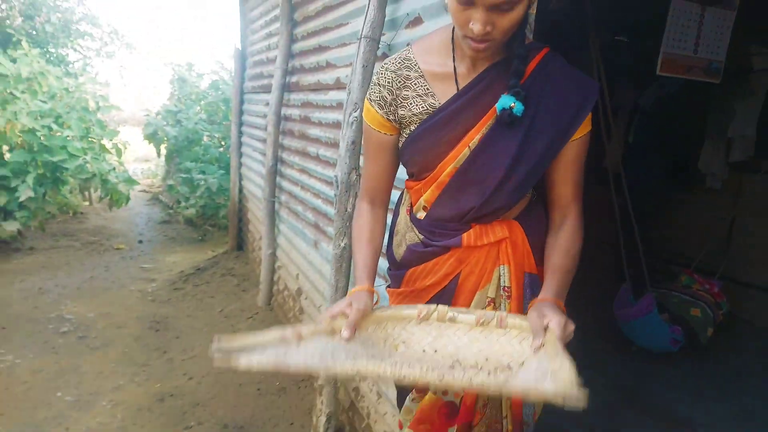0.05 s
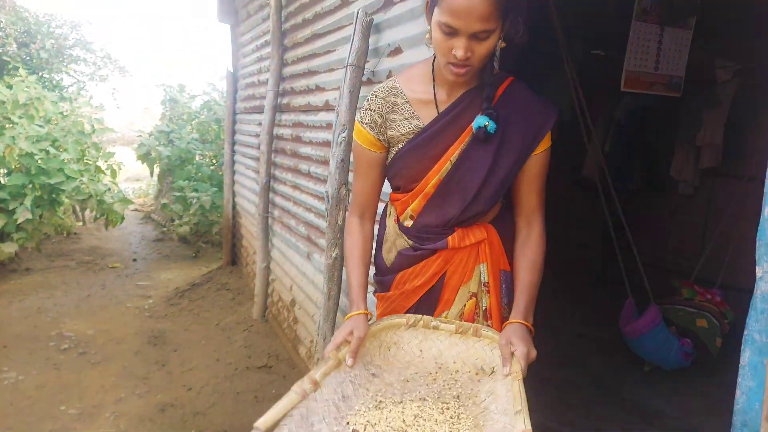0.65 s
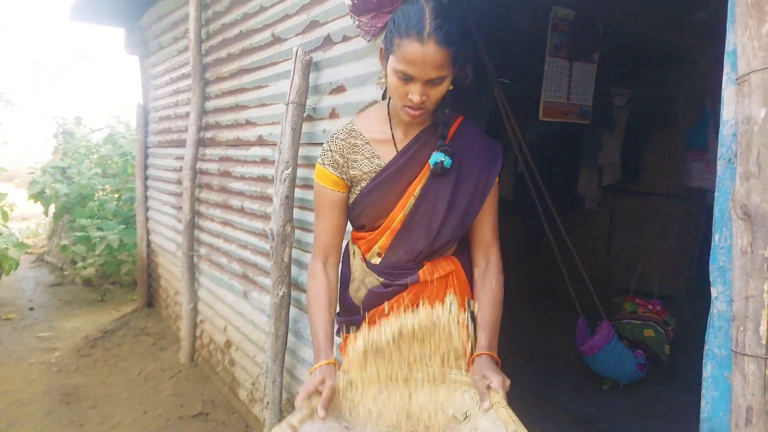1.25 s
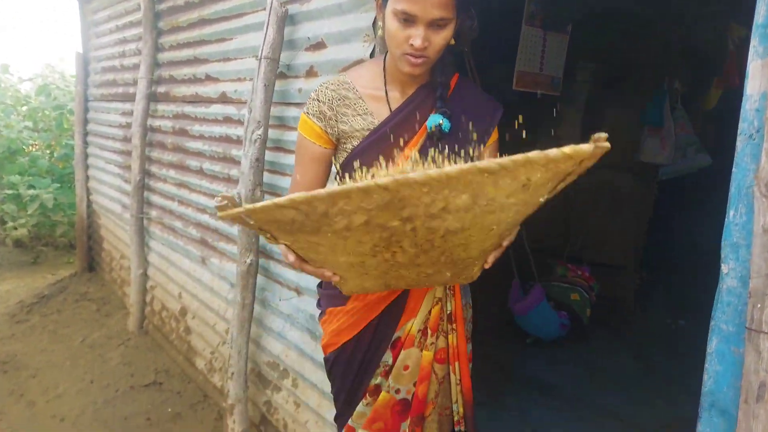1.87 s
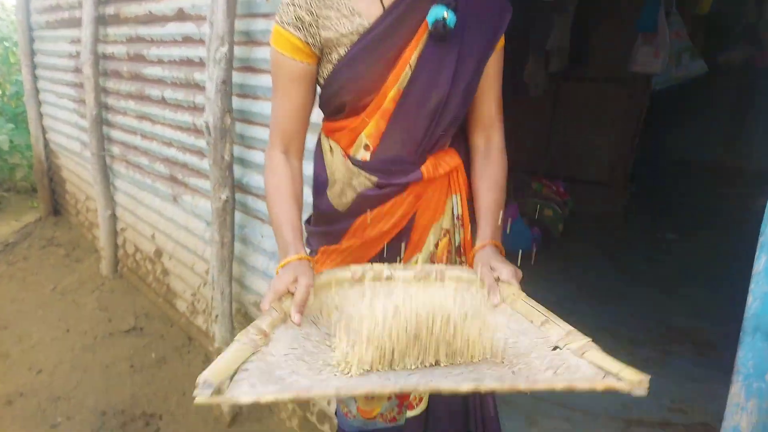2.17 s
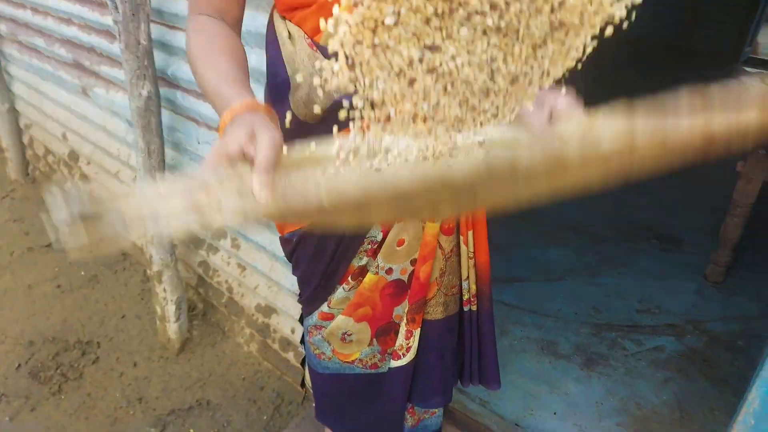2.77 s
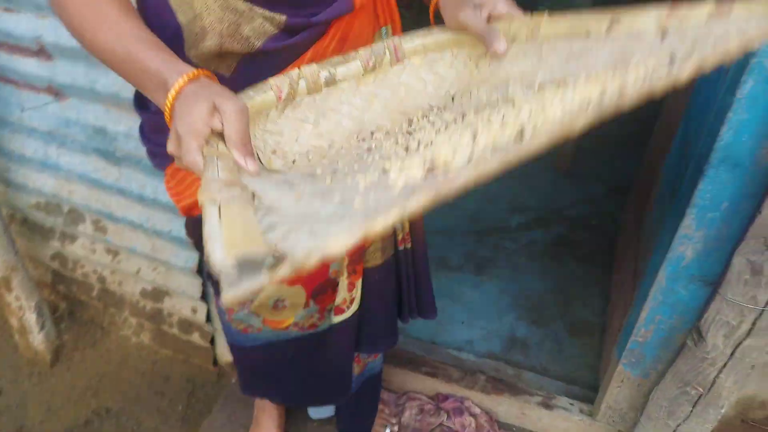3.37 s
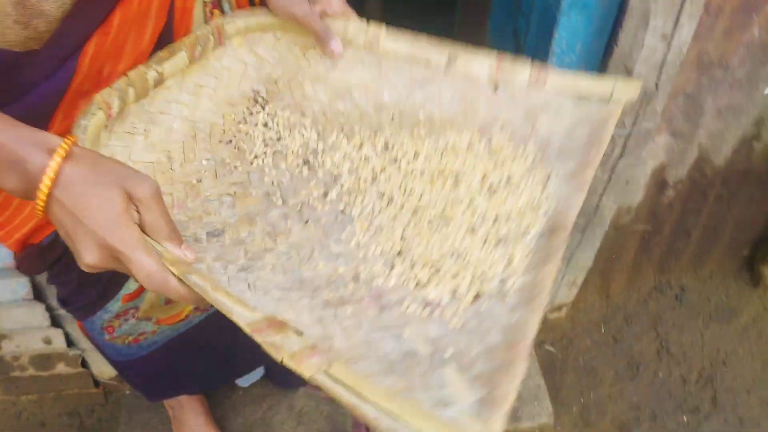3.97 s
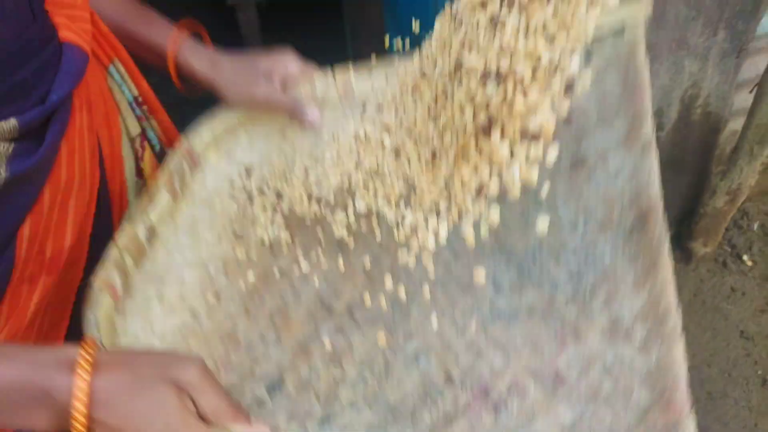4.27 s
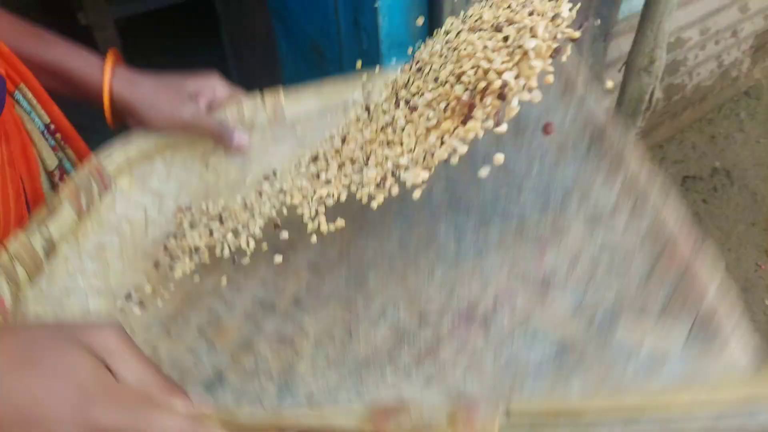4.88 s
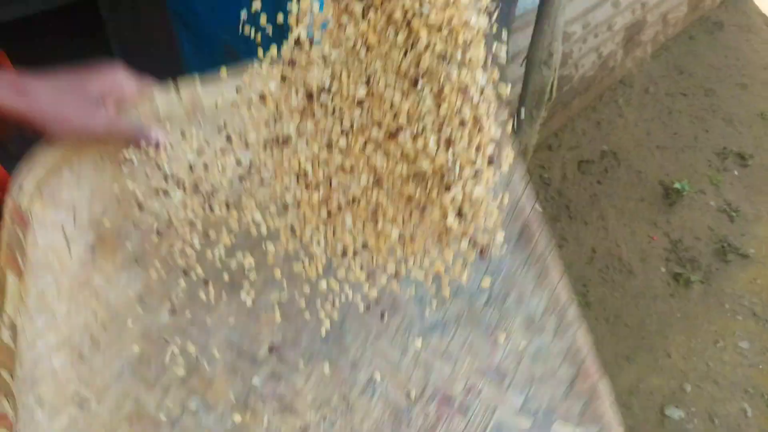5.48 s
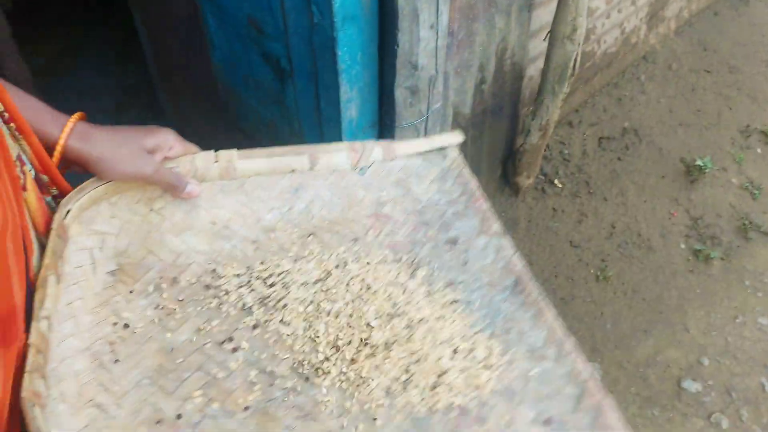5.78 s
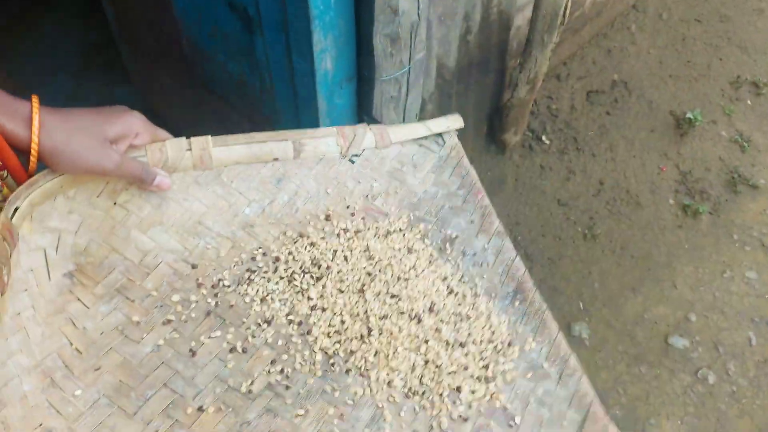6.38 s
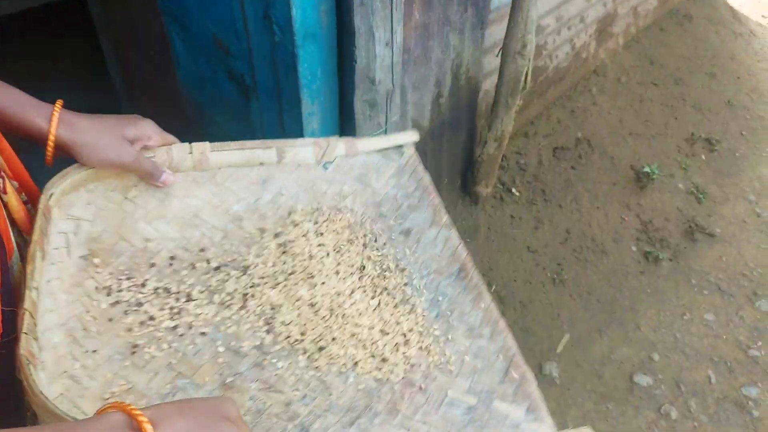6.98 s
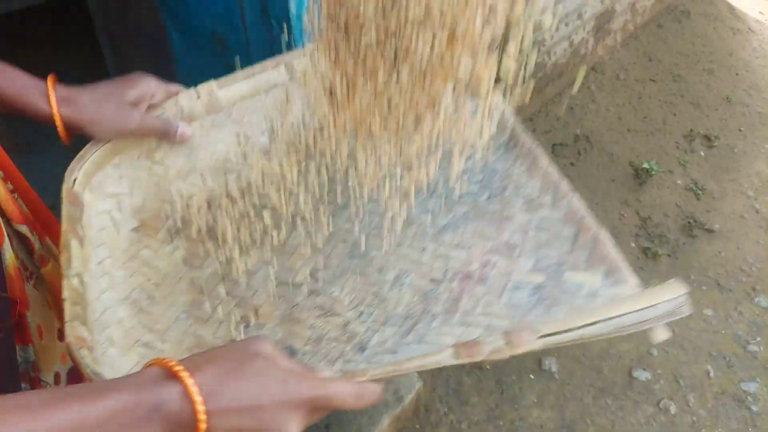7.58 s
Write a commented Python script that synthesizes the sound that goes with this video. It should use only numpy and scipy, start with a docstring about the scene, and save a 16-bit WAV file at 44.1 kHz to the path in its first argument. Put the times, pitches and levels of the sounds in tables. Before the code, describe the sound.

Close, repeated showers of kernels patter and slide across a bamboo winnowing tray, with a low yard rumble and faint bird chirps.

```python
"""Grain swishes on a woven bamboo tray as it is winnowed in front of a house. One toss is already
settling and ten more follow, each a shower of thousands of tiny hits that thins out as the kernels
roll to rest. The tone shifts as the microphone moves from the front of the tray to over it, and one
swing fans a puff of air into it. A small bird chirps, a slow engine thuds far off, the yard rumbles."""
import sys
import numpy as np
from scipy import signal
from scipy.fft import rfft, irfft
from scipy.io import wavfile
from scipy.ndimage import uniform_filter1d

SR = 44100
rng = np.random.default_rng(int(sys.argv[2]) if len(sys.argv) > 2 else 0)


def transcribe(u):
    """Save the signal u as a 16-bit wav file named by the first command-line argument.

    u: samples, shape (n,) or (channels, n), limited to [-1, 1]; the rate is SR.
    q: integer samples, one column per channel.
    """
    v = np.clip(np.atleast_2d(u).T, -1, 1)
    q = np.round(v * 32767).astype(np.int16)
    wavfile.write(sys.argv[1], SR, q)


N = 336924

# One row a toss; each heap lands on another spot of the mat, which rings in its own way:
# start_s, rise_s, abruptness, peak_db, fall_s, roll_db, roll_s, body_db,
# ring_hz, ring_width_hz, ring_db, rattle_db
TOSSES = [ (-0.24, 0.076, 3.0, -26, .14, -25.5, 0.42, -15, 870, 90, -15, -20),
          (0.526, 0.087, 3.46, -20.5, 0.15, -27, 0.4, -23.5, 867, 100, 16, -29),
          (1.36, 0.066, 3.2, -13.5, 0.12, -27, 0.39, -16.5, 824, 295, 0.5, -28),
          (2.213, 0.078, 5.5, -15.5, 0.13, -25, 0.39, -18, 554, 60, 7.5, -41.5),
          (3.029, 0.041, 2.9, -11, 0.082, -24, 0.35, -18.5, 570, 60, 4.5, -10.5),
          (3.802, 0.042, 2.9, -16, 0.14, -26, 0.35, -11.5, 678, 200, -5.5, 2.5),
          (4.458, 0.099, 6.4, -15.5, 0.12, -27.5, 0.3, -10.5, 1394, 1200, -5, 0.5),
          (5.089, 0.099, 4.5, -16, 0.098, -25, 0.26, -11, 1260, 260, -1, -3),
          (5.625, 0.13, 1.45, -16.5, 0.13, -27, .30, -10, 1515, 160, -6.5, -23.5),
          (6.222, 0.13, 1.04, -14, 0.12, -26.5, 0.34, -10, 1450, 260, -2, -4),
          (6.906, 0.072, 3.4, -13, 0.12, -27.5, .34, -16, 1513, 250, -15.5, -32.5), ]
# Tone of kernels striking the weave: pitch_hz, gain_db
WEAVE_TONE = [(150, -47), (250, -2), (268, -21), (313, -7), (490, -10), (593, -5), (681, -7.5), (945, -6.5),
              (1070, -6.5), (1220, -7.5), (2130, -9.5), (3510, -6), (8320, -8.5), (12200, -5.5),
              (15500, -9.5)]
# Where the microphone is: time_s, position (0 in front of the tray, 1 over it)
MIC_POSITION = [(0, 0.37), (2.3, 0.49), (3.1, 0.67), (3.85, 0.88), (4.5, 1), (7, 0.85)]


def grain(hits_per_s=32000, thinning=.62, strip_db=8, split_hz=2000, body_db=-1, hardness=.19):
    """Kernels rain on the bamboo strips; the quieter the swish, the fewer and softer the hits."""
    # Notes at which the strips ring: pitch_hz, width_hz
    strips = [(930, 270), (1250, 540), (2040, 2000), (3250, 1900), (3600, 1200), (4330, 480), (5050, 850),
              (6400, 2000), (10500, 2200), (14800, 980)]
    level_db, mat_db = toss_levels()
    force_db = np.maximum(level_db, -65) + 19  # a swish at -19 dB has hits_per_s hits a second
    per_s = hits_per_s * undb(thinning * force_db)
    lead_s = .00008 * curve(MIC_POSITION)  # over the tray, the left side is nearer
    hits = 0
    for hz, width in strips:
        taps = impacts(per_s / len(strips), lead_s, scatter_db=2, spread_s=.00007)
        hits = hits + taps + undb(strip_db) * ring(taps, hz, width)
    hits = mat(colour(hits, WEAVE_TONE))
    hiss = unit(cut(hits, split_hz, "high", order=3))
    body = unit(cut(hits, split_hz, "low", order=3))
    # falling kernels click brightly, rolling ones are duller
    hiss = hiss + (undb(hardness * force_db) - 1) * cut(hiss, hz=7500, kind="high", order=1)
    swish = hiss + undb(body_db + mat_db) * body
    return undb(level_db) * swish + strip_pings(level_db) + stray_seeds(level_db)


def toss_levels(climb_db=39, fall_db=20.5, roll_loss_db=26.5, creep_db_per_s=28.5, slide_s=.12):
    """Heaps land, roll and creep to rest. Gives the kernels' level and the tray's relative to it, in dB."""
    t = np.arange(N) / SR
    kernel_power, body_power = np.full(N, 1e-11), np.full(N, 1e-12)
    for start_s, rise_s, abruptness, peak_db, fall_s, roll_db, roll_s, body_db, *_ in TOSSES:
        on = t >= start_s
        age = t[on] - start_s
        rise_db = -climb_db * np.maximum(1 - age / rise_s, 0) ** abruptness
        past_peak = np.maximum(age - rise_s, 0)
        # landing and rolling fade ever faster; the last few kernels fade steadily
        landing = undb(peak_db + rise_db - fall_db * (past_peak / fall_s) ** 1.97) ** 2
        rolling = undb(roll_db - roll_loss_db * (past_peak / roll_s) ** 2.3) ** 2
        creeping = undb(roll_db - 24.5 - creep_db_per_s * past_peak) ** 2
        # only kernels that have come down can roll, and they take a moment to start
        moving = undb(rise_db) * np.minimum(age / (rise_s + slide_s), 1)
        settling = (rolling + creeping) * moving ** 2
        kernel_power[on] += landing + settling
        body_power[on] += landing * undb(body_db) ** 2 + settling * undb(-9.5) ** 2
    clumps_db = .97 * wander(70)  # kernels arrive in clumps
    return 10 * np.log10(kernel_power) + clumps_db, 10 * np.log10(body_power / kernel_power)


def impacts(per_s, lead_s, scatter_db, spread_s):
    """Random hits of even average power; each lands elsewhere, so has its own left-right delay."""
    chance, size, lag = rng.random(N), rng.standard_normal(N), rng.laplace(size=N)
    left_at = np.flatnonzero(chance < per_s / SR)
    sign = np.sign(rng.random(N)[left_at] - .5)
    push = sign * undb(scatter_db * np.minimum(size[left_at], 2)) / np.sqrt(per_s[left_at])
    delay_s = lead_s[left_at] + lag[left_at] * spread_s
    right_at = np.clip(left_at + np.round(delay_s * SR).astype(int), 0, N - 1)
    return np.array([np.bincount(left_at, push, N), np.bincount(right_at, push, N)])


def mat(hits, swell_s=.051, lag_s=.0056):
    """While a heap comes down, the spot under it drums and the loose strips rattle."""
    out, t = hits, np.arange(N) / SR
    rattle = ring(hits, hz=3100, width_hz=600)
    for start_s, rise_s, *_, hz, width, ring_db, rattle_db in TOSSES:
        swell = np.exp(-((t - start_s - rise_s - lag_s) / swell_s) ** 2)
        out = out + swell * (undb(ring_db) * ring(hits, hz, width) + undb(rattle_db) * rattle)
    return out


def strip_pings(level_db, count=2500, fade_s=.057, low_hz=700, high_hz=13000, ping_db=-3, bright_db=5):
    """Some kernels hit a tight strip squarely, and it rings briefly at its own pitch."""
    out, t = np.zeros((2, N + 2048)), np.arange(2048) / SR
    for when, height, size, side in rng.random((count, 4)):
        start = int(when * (N - 1))
        hz = low_hz * (high_hz / low_hz) ** height
        tone = np.sin(2 * np.pi * hz * t) * undb(-60 * t / fade_s)
        # the short, high strips sound louder than the long ones
        gain = size ** 2 * undb(level_db[start] + ping_db + bright_db * height)
        out[:, start:start + len(t)] += gain * np.outer([side, 1 - side], tone)
    return out[:, :N]


def stray_seeds(level_db, per_s=130, loudest_db=-38, follow=.85):
    """Single seeds keep bouncing as the heap settles; their crisp ticks die down slower than the swish."""
    taps = impacts(np.full(N, per_s), np.zeros(N), scatter_db=4, spread_s=.0002)
    seeds = colour(taps + 2 * ring(taps, hz=4200, width_hz=1500), WEAVE_TONE)
    drop_db = follow * np.minimum(level_db + 28, 0)  # they fade once the swish is below -28 dB
    return unit(cut(seeds, 1800, "high")) * undb(loudest_db + drop_db)


def ticks(fade_s=.02, width_hz=1300, snap=.42, gain_db=-2):
    """Lone kernels and the bending rim each make a dry snap with a short ring."""
    # Kernel clicks and rim creaks: start_s, relative_peak_db, ring_hz
    snaps = [(0.9347, -21, 5060), (1.3437, -25, 5040), (2.621, -32, 5000), (3.4118, -27, 3960),
             (3.795, -24.5, 3590), (3.8062, -24, 2970), (4.3819, -34, 4990), (4.467, -14, 5100),
             (4.9795, -34, 3970), (5.1058, -11, 5440), (5.466, -26, 4600), (5.5297, -33, 4130),
             (5.658, -17, 4800), (6.088, -31.5, 6500), (6.2762, -14.5, 4370), (6.717, -29, 3550),
             (6.832, -32.5, 5000), (6.9045, -20, 4530)]
    out, t = np.zeros((2, N)), np.arange(1024) / SR
    for start_s, db, hz in snaps:
        crack = rng.standard_normal((2, len(t))) * undb(-60 * t / fade_s)
        tick = snap * crack + ring(crack, hz, width_hz)
        start = int(start_s * SR)
        out[:, start:start + len(t)] += undb(db + gain_db) * tick / np.abs(tick).max()
    return out


def moving_microphone(x):
    """The microphone's two sides face different ways, so their tone changes as it moves over the tray."""
    # Balance in front of the tray, then over it: pitch_hz, left_minus_right_db
    in_front = [(300, -5), (1500, 2), (2700, 3.5), (4300, -10.5), (6000, -10), (8000, 4), (11000, 6.5),
                (15000, 4.5)]
    overhead = [(300, 3), (1500, 0.5), (2700, 0.5), (4300, -2), (6000, -2.5), (8000, 1.8), (11000, 0),
                (15000, 3.5)]

    def heard(balance):
        left = colour(x[[0]], [(hz, db / 2) for hz, db in balance])
        right = colour(x[[1]], [(hz, -db / 2) for hz, db in balance])
        return np.vstack([left, right])
    position = curve(MIC_POSITION)
    return (1 - position) * heard(in_front) + position * heard(overhead)


def wall_echo(x, fade_s, dull_hz, delay_s=.006):
    """Sound bounces off the house front and the doorway as a blurred echo."""
    t = np.arange(SR // 2) / SR
    tail = rng.standard_normal((2, len(t))) * undb(-60 * t / fade_s) * (t > delay_s)
    tail /= np.sqrt(np.sum(tail ** 2) / 2)
    return signal.fftconvolve(x, cut(tail, dull_hz, "low", order=1), axes=1)[:, :N]


def air_puff(left_db=-32):
    """Swirls of air from the swinging tray buffet the right side of the microphone."""
    # Tone of the swirling air: pitch_hz, gain_db
    swirl_tone = [(25, -30), (40, -14), (55, 1), (120, 1), (160, -9), (230, -12), (380, -21), (600, -40),
                  (1200, -70)]
    # Strength of the puff: time_s, level_db
    strength = [(2.87, -60), (2.905, -36), (2.94, -15), (2.995, -13.5), (3.022, -23.5), (3.042, -18),
                (3.06, -27), (3.1, -59)]
    swirls = colour(rng.standard_normal((1, N)), swirl_tone)
    swirls /= np.sqrt(uniform_filter1d(swirls ** 2, size=1300))  # even out chance swells
    return swirls * undb(curve(strength, outside=-140)) * np.array([[undb(left_db)], [1]])


def bird(flutter_db=2.5, gain_db=3):
    """A small bird sings short, raspy, breathy glides that echo briefly off the walls."""
    # The bird's notes: start_s, length_s, from_hz, to_hz, relative_level_db
    chirps = [(4.9, .07, 3600, 3150, -55), (4.91, .055, 4200, 3850, -55), (5.044, .03, 6200, 5400, -60),
              (5.055, .05, 4400, 3400, -52), (7.573, .04, 5400, 6000, -47), (7.608, .05, 3800, 5900, -41)]
    out, flutter = np.zeros(2 * N), wander(250)
    rasp = 1 + .045 * wander(1100)
    breath = .28 * unit(ring(rng.standard_normal(N), hz=5200, width_hz=2200))
    for start_s, length_s, from_hz, to_hz, db in chirps:
        progress = np.linspace(0, 1, int(length_s * SR))
        at = int(start_s * SR) + np.arange(len(progress))
        hz = (from_hz + (to_hz - from_hz) * progress) * rasp[at % N]
        phase = 2 * np.pi * np.cumsum(hz) / SR
        note = np.sin(phase) + .027 * np.sin(2 * phase) + breath[at % N]
        out[at] += undb(db + flutter_db * flutter[at % N]) * np.sin(np.pi * progress) * note
    song = undb(gain_db) * np.array([out[:N], out[:N]])
    return song + undb(-6) * wall_echo(song, fade_s=.15, dull_hz=9000)


def far_engine(firing_hz=20.18):
    """Each firing of a one-cylinder engine makes its exhaust boom; distance softens the thuds."""
    # Notes at which the exhaust rings: pitch_hz, width_hz, gain_db
    exhaust = [(81, 26, 4), (102, 26, -2), (158, 70, -11), (201, 20, -8), (242, 10, 1)]
    # Loudness of the engine: time_s, level_db
    loudness = [(0, -42.5), (2.2, -49.5), (2.7, -46), (3.6, -52.5), (4.6, -44.5), (5.6, -47.5),
                (6.7, -43.5), (7.5, -51.5)]
    cycles = np.cumsum(firing_hz * (1 + .003 * wander(2))) / SR
    firings = np.diff(np.floor(cycles), prepend=0) * undb(1.2 * wander(20))  # one kick a cycle
    thuds = 0
    for hz, width, db in exhaust:
        boom = ring(ring(firings, hz, width), hz, width)
        thuds = thuds + undb(db + 1.8 * wander(5)) * boom
    return undb(curve(loudness)) * unit(thuds)


def yard(shared_hz=900, bass_side=.19, flicker_db=1, gain_db=-3.5):
    """Distant outdoor rumble, alike on both sides in the bass and unrelated in the treble."""
    # Tone of the rumble: pitch_hz, gain_db
    rumble_tone = [(18, -24), (30, -48), (69, 10), (187, -1.5), (249, -6), (299, -4), (546, -11.5),
                   (622, -12.5), (709, -9.5), (996, -17.5), (2760, -26), (14300, -44), (15500, -64.5)]
    # Loudness of the rumble: time_s, relative_level_db
    loudness = [(0, -40.5), (1.9, -41), (2.75, -38.5), (3.6, -44), (5, -42), (6.6, -42), (7.6, -44)]
    mid, side = rng.standard_normal((2, N))
    side = bass_side * side + (1 - bass_side) * cut(side, shared_hz, "high", order=1)
    air = colour(np.array([mid + side, mid - side]), rumble_tone)
    air = cut(air, 90, "high", order=1)
    return unit(air) * undb(curve(loudness) + gain_db + flicker_db * wander(9.6))


def undb(db):
    """Turn decibels into a factor to multiply by."""
    return 10 ** (np.asarray(db) / 20)


def curve(rows, outside=None):
    """Join (time_s, value) rows with straight lines, giving a value at every sample."""
    times, values = np.transpose(rows)
    return np.interp(np.arange(N) / SR, times, values, left=outside, right=outside)


def unit(x):
    """Scale a sound to an average power of 1."""
    return x / np.sqrt(np.mean(x ** 2))


def ring(x, hz, width_hz):
    """Let a sound ring at one pitch; a narrower width rings longer."""
    return signal.lfilter(*signal.iirpeak(min(hz, .45 * SR), hz / width_hz, fs=SR), x)


def cut(x, hz, kind, order=2):
    """Keep the "low" or the "high" side of hz."""
    return signal.sosfilt(signal.butter(order, hz, kind, fs=SR, output="sos"), x)


def colour(x, points, size=4096):
    """Shape a sound's tone to follow (pitch_hz, gain_db) points."""
    hz, db = np.transpose(points)
    grid_hz = np.maximum(np.fft.rfftfreq(size, 1 / SR), 1)
    gains = undb(np.interp(np.log(grid_hz), np.log(hz), db))
    # folding the cepstrum (the transformed log gains) keeps the filter from sounding before a hit
    cepstrum = irfft(np.log(gains))
    cepstrum[1:size // 2] *= 2
    cepstrum[size // 2 + 1:] = 0
    response = irfft(np.exp(rfft(cepstrum)))
    return signal.fftconvolve(x, response[None], axes=1)[:, :N]


def wander(per_s):
    """A random drift of roughly plus or minus 1 that heads for a new value per_s times a second."""
    step = int(SR / per_s)
    return uniform_filter1d(np.repeat(rng.standard_normal(N // step + 1), step), step)[:N]


def scene():
    """The tray close by, its echo, and the yard around it."""
    tray = moving_microphone(grain() + ticks())
    echo = undb(-14.5) * wall_echo(tray, fade_s=.4, dull_hz=4940)
    return tray + echo + air_puff() + bird() + far_engine() + yard()


def record(dry):
    """Clip the highest peaks and cut the very top of the treble."""
    treble_cut = signal.ellip(10, .2, 70, 15650, fs=SR, output="sos")  # steep, above 15650 Hz
    return signal.sosfilt(treble_cut, np.clip(dry, -.7, .7))


dry = scene()
out = record(dry)
transcribe(out)
```